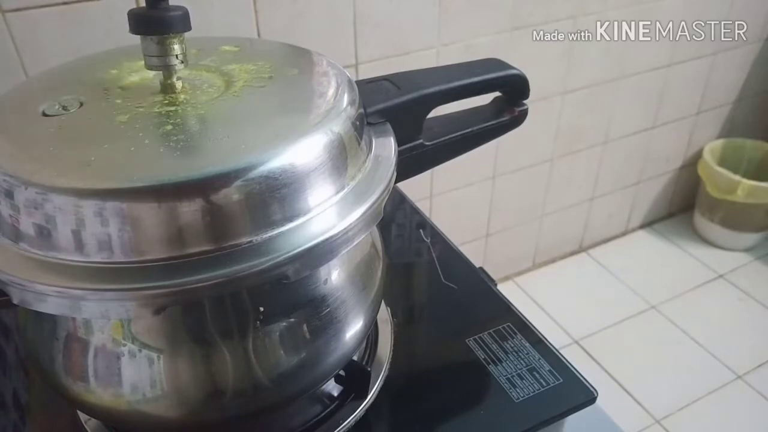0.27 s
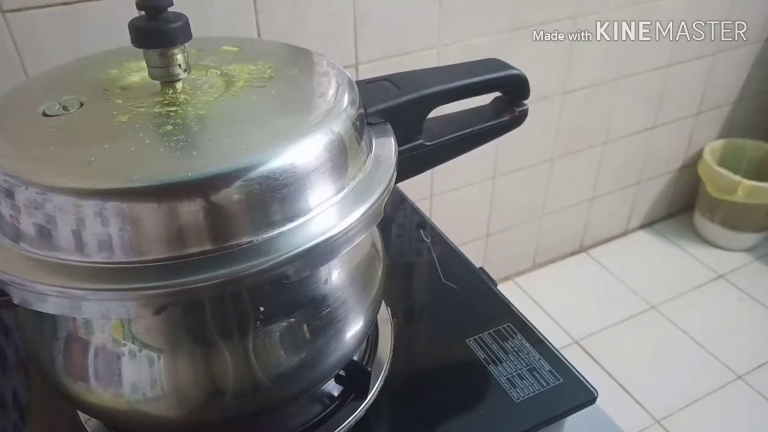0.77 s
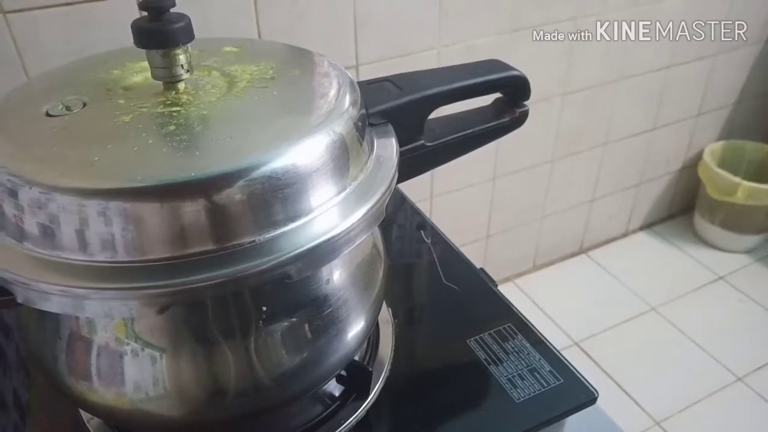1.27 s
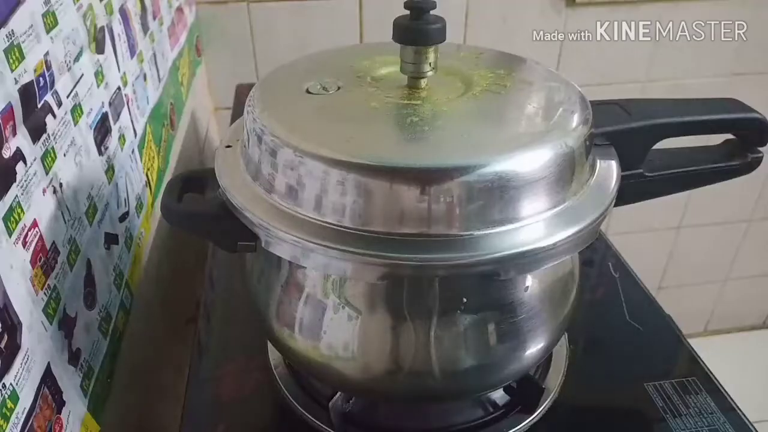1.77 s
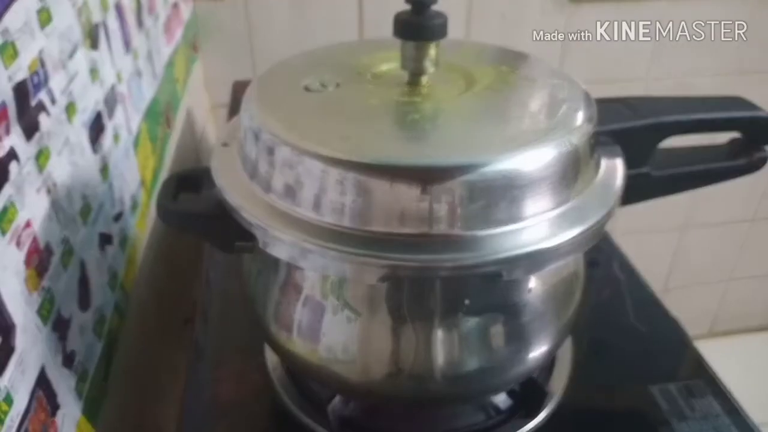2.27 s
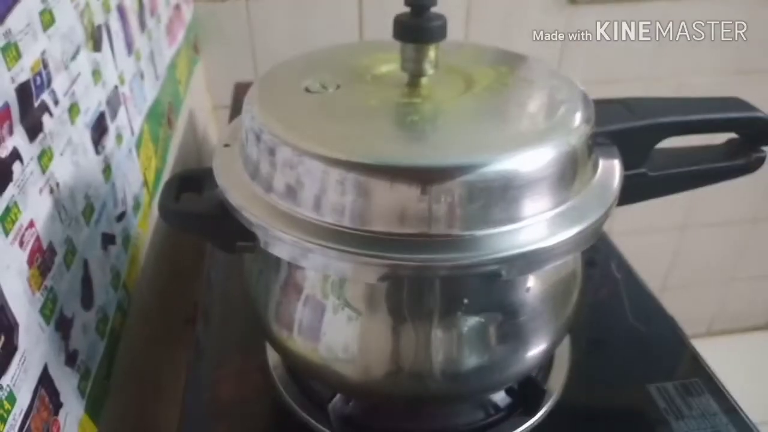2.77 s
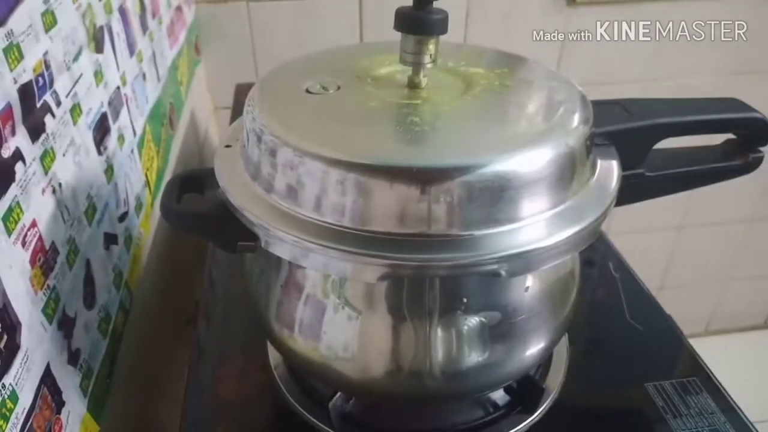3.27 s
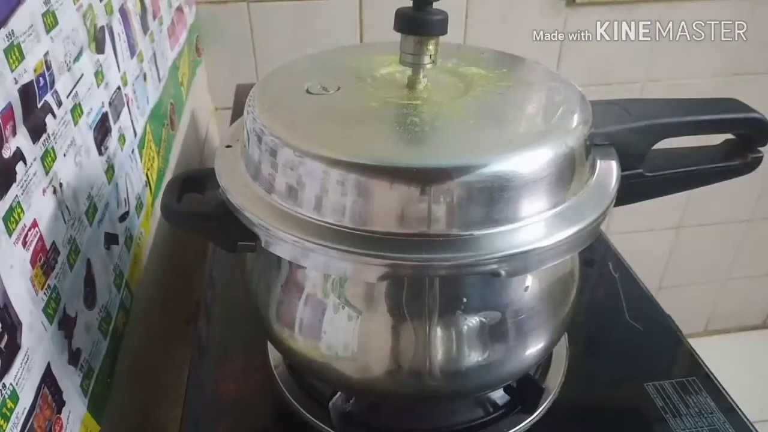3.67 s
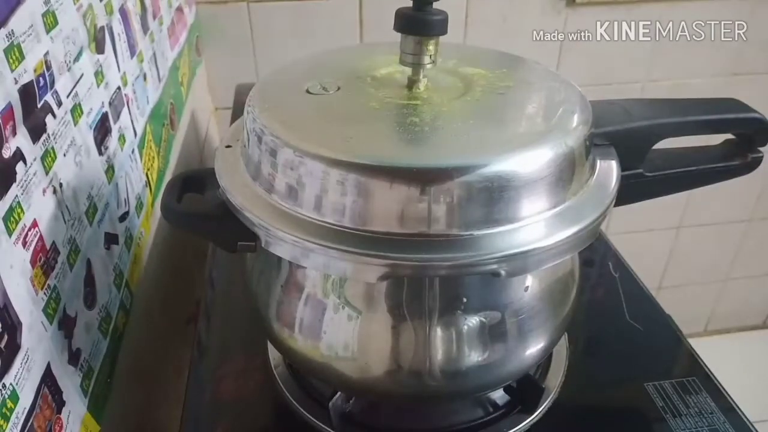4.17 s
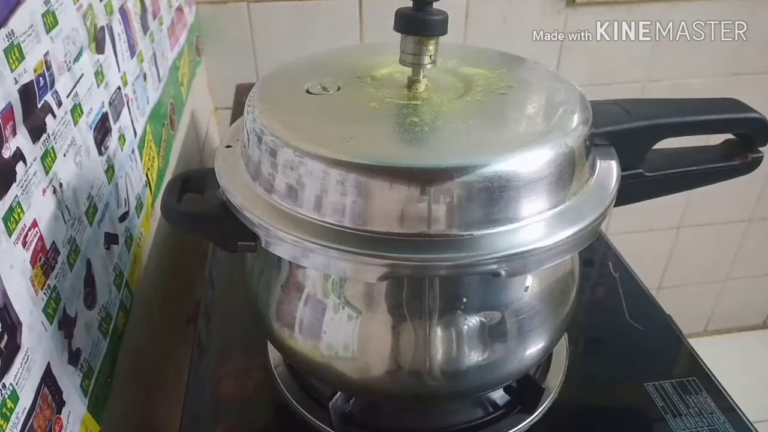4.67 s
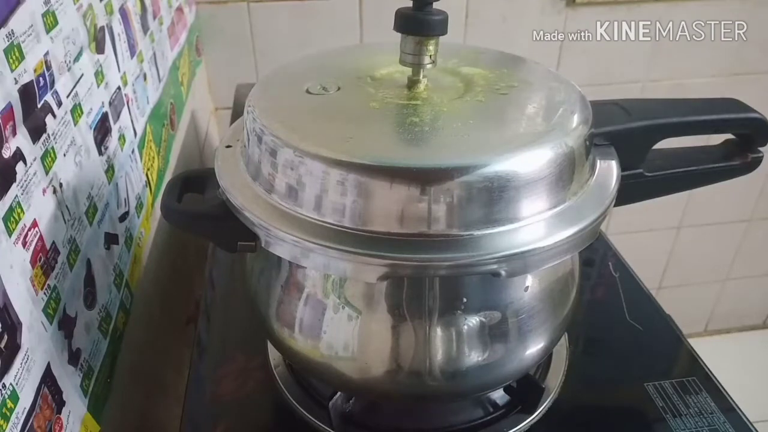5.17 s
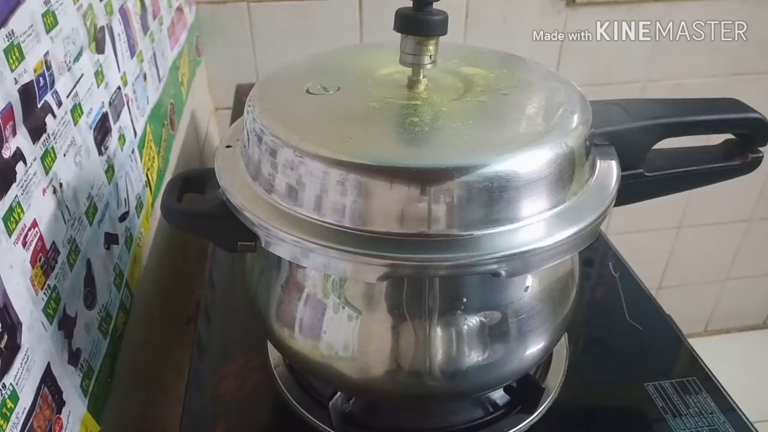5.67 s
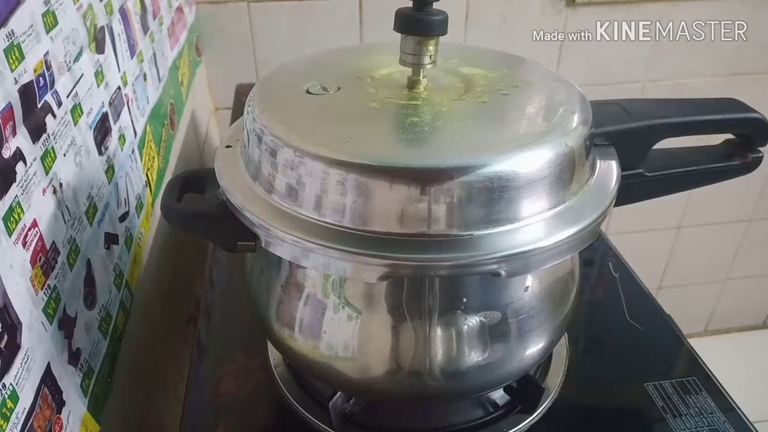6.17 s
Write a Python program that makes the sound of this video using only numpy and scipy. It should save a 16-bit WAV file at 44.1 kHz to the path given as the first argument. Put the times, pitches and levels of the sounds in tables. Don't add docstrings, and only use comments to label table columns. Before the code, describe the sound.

Close in a tiled kitchen, a pressure cooker blasts steam in a loud, overloaded hiss. It collapses within half a second; the weight sputters and lands with a short breathy hoot. A near-silent leak follows over a low beating motor hum and faint gas flame. At a cut the hiss steps up, puffs unevenly, then surges into a full, roaring blast that holds to the end.

```python
import sys
import numpy as np
from scipy import signal
from scipy.fft import rfft, irfft, next_fast_len
from scipy.io import wavfile
from scipy.ndimage import uniform_filter1d, map_coordinates

SR = 44100
rng = np.random.default_rng(int(sys.argv[2]) if len(sys.argv) > 2 else 0)


def decibels_to_gain(level_db):
    exponent = np.asarray(level_db, float) / 20
    return 10 ** exponent


def to_wav(sig):
    pcm = np.clip(np.atleast_2d(sig), -1, 1) * 32767
    pcm = np.round(pcm).astype(np.int16)
    wavfile.write(sys.argv[1], SR, pcm.T)


N = 283122

CUT_S = 1.52
SEAT_S = 0.541
STAGES = [
    .5,
    .72,
    1.5,
    1.55,
    2.96,
    3.04,
]


def unit(x):
    return x / np.sqrt(np.mean(x ** 2) + 1e-20)


def curves(rows):
    s, *cols = np.transpose(rows)
    return [np.interp(np.arange(N) / SR, s, c) for c in cols]


def wobble(rate):
    knots = rng.standard_normal(int(N * rate / SR) + 4)
    return map_coordinates(knots, [np.arange(N) * rate / SR])


def bump(at, before, after):
    t = np.arange(N) / SR - at
    return np.exp(-(t / np.where(t < 0, before, after)) ** 2)


def filtered(x, response):
    m = next_fast_len(N + 8192)
    return irfft(rfft(x, m) * response(np.fft.rfftfreq(m, 1 / SR)), m)[..., :N]


def colour(points):
    f, db = np.transpose(points)
    return lambda hz: decibels_to_gain(np.interp(np.log(hz + 1), np.log(f + 1), db))


def resonant(modes):
    def response(f):
        total = 0
        for k, (centre, width, db) in enumerate(modes):
            damping = 1j * f * width
            total = total + (-1) ** k * decibels_to_gain(db) * damping / (centre * centre - f * f + damping)
        return total
    return response


def patchy(depth_db, bins, frames, ceiling):
    _, at, z = signal.stft(rng.standard_normal(N + 512), nperseg=512)
    field = uniform_filter1d(rng.standard_normal(z.shape), bins, 0)
    field = uniform_filter1d(field, frames, 1)
    depth = np.interp(at, np.arange(N), depth_db + np.zeros(N))
    gain = decibels_to_gain(depth * np.minimum(unit(field), ceiling))
    return signal.istft(z * gain, nperseg=512)[1][:N]


def rough_tone(hz, scatter, rate):
    phase = 2 * np.pi * np.cumsum(hz + np.zeros(N)) / SR
    return np.sqrt(2) * np.sin(phase + scatter * wobble(rate))


def jet():
    # frequency in Hz, level in dB per Hz.
    first_blast = [(1470, -17), (2500, -13.5), (3400, -16), (4580, -8), (5670, -3), (6720, -1.5),
                   (7830, -12.5), (8920, -4), (9630, -4), (10500, 0.5), (11500, -8), (12500, -7.5),
                   (13300, -17), (14900, -9), (15600, -20)]
    leak = [(1060, -31), (1800, -8), (1900, -6), (2380, -7), (2560, -8), (2750, -7.5), (4570, -8.5),
            (6150, -3.5), (6730, 1.5), (7920, -16), (8910, -9), (9660, -9), (10800, -4.5), (11700, -11),
            (15600, -24)]
    build_up = [(530, -70), (900, -30), (1670, -14), (2630, -12.5), (3150, -9.5), (3680, -13.5), (5080, -8),
                (5660, -10.5), (6530, 1.5), (7810, -13), (8690, -5), (11200, -4.5), (12100, -10),
                (13000, -9), (15600, -17)]
    full_blast = [(2350, -25.5), (4000, -7.5), (5930, -5.5), (6530, 1), (7790, -9.5), (8430, -7.5),
                  (8980, -8), (9840, -5), (11500, -4.5), (12400, -10.5), (14800, -10.5), (15600, -18)]
    stage = np.interp(np.arange(N) / SR, STAGES, [0, 1, 1, 2, 2, 3])
    eddies = filtered(patchy(0.65, 8, 10, ceiling=3.5), tiled)
    reflected = filtered(eddies, ridged)
    layers = [(eddies, first_blast), (eddies, leak), (reflected, build_up), (reflected, full_blast)]
    mix = 0
    for k, (noise, shape) in enumerate(layers):
        share = np.clip(1 - abs(stage - k), 0, 1)
        mix = mix + share * unit(filtered(noise, colour(shape)))
    unsteady = 1 - .8 * np.clip(stage - 2, 0, 1)
    return mix * decibels_to_gain(unsteady * (0.44 * wobble(7.3) + 0.14 * wobble(25)))


def tiled(hz):
    # delay in seconds, level in dB.
    echoes = [(.0021, -17), (.0036, -17), (.0052, -18), (.0078, -19), (.0104, -20), (.0137, -22),
              (.0171, -24)]
    return 1 + sum(decibels_to_gain(db) * np.exp(-2j * np.pi * hz * delay) for delay, db in echoes)


def ridged(hz):
    # centre in Hz, width in Hz, gain in dB.
    ridges = [(2590, 160, -7.5), (3450, 120, 4.5), (5160, 270, 2.5), (6850, 160, 0.5), (7770, 220, -3),
              (8350, 440, 2.5), (8960, 100, -1), (9750, 350, 3.5), (10950, 180, 0.5), (11210, 210, 3.5),
              (11620, 490, -3), (12900, 370, -0.5), (14100, 220, -2), (14700, 250, -1)]
    return decibels_to_gain(sum(db * np.exp(-((hz - c) / w) ** 2) for c, w, db in ridges))


def puffs_db():
    # time in seconds, gain in dB, half length in seconds.
    puffs = [
        (.4, 0.5, .008),
        (0.433, 2, .012),
        (0.486, 5, 0.0084),
        (0.54, 5, 0.023),
        (1.9, 0.7, 0.043),
        (2.31, 2.5, 0.055),
        (2.494, 2, 0.04),
        (2.748, 4, 0.055),
        (5.76, 1.2, .05),
    ]
    return sum(db * bump(s, half, half) for s, db, half in puffs)


def overload(steam, flow_db, drive, ultrasound, bias):
    # frequency in Hz, gain in dB.
    roar_colour = [(25, -46), (50, -12), (80, 0), (150, 4.5), (1000, 3), (3000, 2), (5500, -6), (7700, -8),
                   (10000, -5), (15000, -29)]
    # time in seconds, loss in dB.
    swings = [(.2, 14), (3.13, 0.5), (3.27, 2.5), (3.61, -1), (4.15, 3), (4.52, 1.5), (4.71, 1.5),
              (5.11, 0), (5.38, 1.5), (5.62, 1), (6.09, 2.5)]
    sink_s, snap_s = 0.024, 0.011
    knee_db = -22.5
    below_knee, above_knee = 8.6, 1.5
    roar_db = -34
    nearer_db, surge_db, surge_s = 4.5, 2.5, 0.99
    t = np.arange(N) / SR

    unheard = unit(filtered(rng.standard_normal(N), lambda hz: hz > 16000))
    push = drive * (steam + ultrasound * unheard * decibels_to_gain(0.66 * wobble(40)))
    bent = np.tanh(push + bias)
    bent = bent - np.mean(bent) - push * np.mean(bent * push) / np.mean(push ** 2)
    roar = filtered(bent, colour(roar_colour))
    scale = np.std(filtered(roar, lambda hz: (hz > 300) & (hz < 2500)))

    over = flow_db - knee_db
    nearer = (t > CUT_S) * (nearer_db + surge_db * np.exp(-abs(t - STAGES[-1]) / surge_s))
    loss = sum(db * bump(s, sink_s, snap_s) for s, db in swings)
    level_db = roar_db + np.minimum(below_knee * over, above_knee * over) + nearer - loss
    return roar / scale * decibels_to_gain(level_db + 0.6 * wobble(40) + 0.84 * wobble(70))


def hoot():
    # time in seconds, frequency in Hz.
    pitch = [
        (.42, 415),
        (.5, 437),
        (.56, 439.4),
        (.7, 425),
    ]
    # frequency in Hz, width in Hz, level in dB.
    stem_modes = [(437, 110, 1), (636, 44, -2), (866, 55, -12), (1340, 170, -8)]
    hoot_db, fall_db_per_s = -42.5, 77
    rise_s, hold_s, last_s = .03, .085, .19
    whistle_hz, whistle_db, whistle_s, tail_db = 4320, -35, .007, -54

    late = np.arange(N) / SR - SEAT_S
    rise = np.clip(1 + (late + hold_s) / rise_s, 0, 1)
    fall = decibels_to_gain(-fall_db_per_s * np.maximum(late, 0) + 1.3 * wobble(45))
    envelope = rise * fall * np.clip((last_s - late) / 0.044, 0, 1)
    breathy = unit(filtered(rng.standard_normal(N), resonant(stem_modes)))
    stem = rough_tone(curves(pitch)[0], 1.3, 59.9) + decibels_to_gain(2.5) * breathy
    blip = decibels_to_gain(whistle_db) * bump(SEAT_S, whistle_s, whistle_s)
    trail = decibels_to_gain(tail_db) * bump(SEAT_S, .06, 0.16)
    return decibels_to_gain(hoot_db) * envelope * stem + (blip + trail) * rough_tone(whistle_hz, 1.5, 89.7)


def motors():
    # start in seconds, beats per second.
    slip = [(.53, 9.09), (.97, 8.22), (1.335, 9.09), (1.555, 9.76), (2.17, 10.62), (2.735, 9.3)]
    # time in seconds, peak of the swell in dB.
    hum_level = [(.52, -54), (.58, -37.5), (.78, -40), (.9, -44), (1.12, -41.5), (1.45, -43.5), (1.58, -49),
                 (1.75, -42.5), (2.9, -42)]
    # frequency in Hz, level in dB per Hz.
    casing = [(60, -120), (110, -26), (140, 4), (180, 1.5), (230, -1.5), (275, -6), (330, -23), (500, -120)]
    # frequency in Hz, level in dB, start in seconds, end in seconds.
    overtones = [
        (250, -63, 0, 7.5),
        (199, -67, 1, 6),
        (360, -64, 0.5, 1.2),
        (530, -70, 1.5, 2.15),
        (625, -66, .75, 1.53),
        (520, -67, .75, 1.1),
        (343, -62, 2.72, 2.93),
    ]
    motor_hz = 124.7
    t = np.arange(N) / SR
    since, rate = np.transpose(slip)
    current = np.maximum(np.searchsorted(since, t) - 1, 0)
    beats = np.cumsum(rate[current]) / SR - since[0] * rate[0]
    swell = decibels_to_gain(curves(hum_level)[0] + 0.8 * wobble(9))
    phase = 2 * np.pi * motor_hz * t
    hum = 0.35 * np.sin(phase) - 0.43 * np.sin(phase - 2 * np.pi * beats)
    rattle = unit(filtered(rng.standard_normal(N), colour(casing)))
    rattle = rattle * (0.81 + abs(np.sin(np.pi * beats)))
    lines = 0
    for hz, db, start, end in overtones:
        fade = np.clip(np.minimum(t - start, end - t) / 0.049, 0, 1)
        lines = lines + decibels_to_gain(db + 2.6 * wobble(14)) * rough_tone(hz, 1.14, 25) * fade
    return swell * (hum + decibels_to_gain(-17.5) * rattle) + lines


def kitchen():
    # time in seconds, depth in dB.
    holes = [(1.48, 6), (1.56, 15)]
    # frequency in Hz, level in dB per Hz.
    flame_colour = [(82, -31), (140, -5), (145, -27), (253, -8), (276, -8.5), (362, -10.5), (612, -10),
                    (1010, -16), (1500, -16.5), (3000, -31), (3900, -67), (6600, -120)]
    rumble_colour = [(20, -30), (40, -10), (60, 0), (90, 7), (130, -30), (220, -120)]
    t = np.arange(N) / SR
    flame = unit(filtered(patchy(curves(holes)[0], 2, 9, ceiling=0.25), colour(flame_colour)))
    rumble = unit(filtered(rng.standard_normal(N), colour(rumble_colour)))
    room_db = np.where(t < CUT_S, -55, -60.5)
    room_db = room_db + 6.5 * bump(SEAT_S, 0.15, 0.23)
    rumble_db = -57 - 9 * (t > 1)
    return decibels_to_gain(room_db) * flame + decibels_to_gain(rumble_db) * rumble


def scene():
    # time in seconds, hiss level in dB.
    flow = [(0, -22), (.29, -21), (.35, -21.5), (.4, -26), (.5, -30.5), (.6, -36), (.8, -55), (1.5, -55.5),
            (1.6, -40), (1.7, -35.5), (2.2, -34), (2.83, -32.5), (2.95, -25), (3.03, -21.5), (3.12, -21.5),
            (6.42, -21.5)]
    steam = jet()
    flow_db = curves(flow)[0]
    hiss = decibels_to_gain(flow_db + puffs_db()) * steam
    blast = hiss + overload(steam, flow_db, drive=1.36, ultrasound=1.44, bias=-0.38)
    return np.tile(blast + hoot() + motors() + kitchen(), (2, 1))


def low_pass(x):
    return signal.sosfilt(signal.butter(12, 16530, fs=SR, output="sos"), x)


def record(dry):
    top_hz = 15490
    mix = filtered(dry, lambda hz: hz < top_hz)
    return low_pass(mix)


dry = scene()
out = record(dry)
to_wav(out)
```